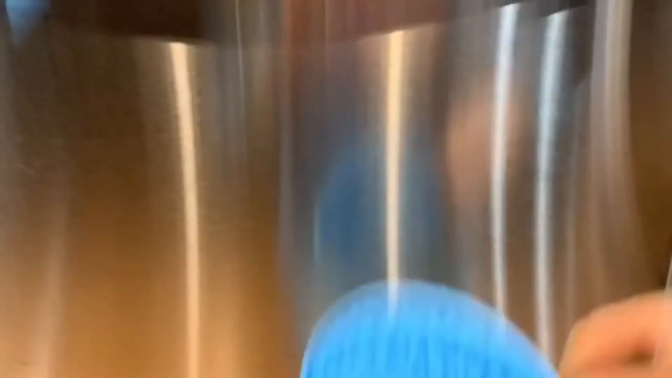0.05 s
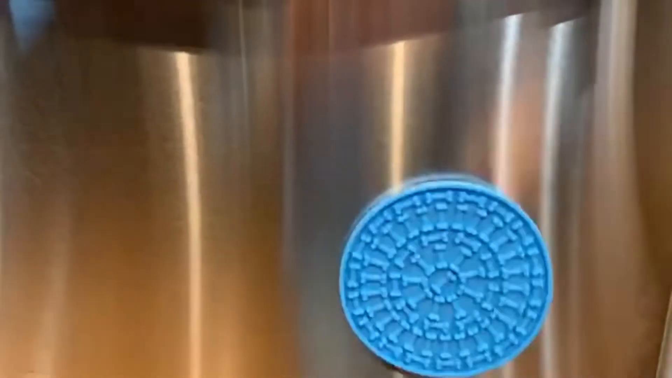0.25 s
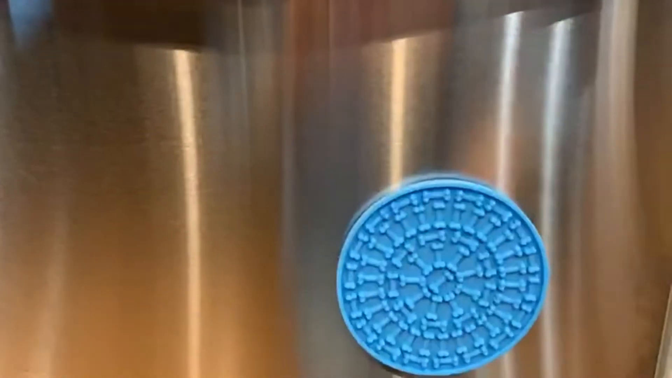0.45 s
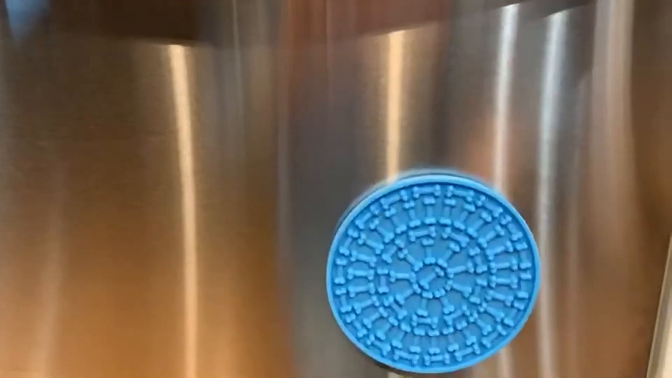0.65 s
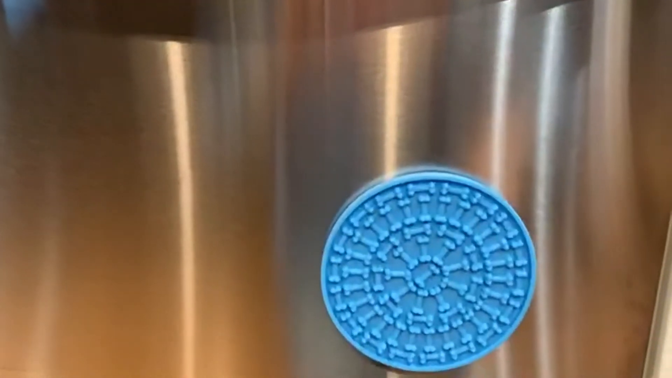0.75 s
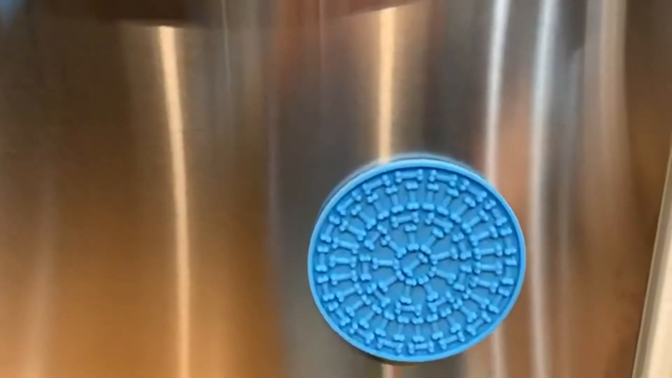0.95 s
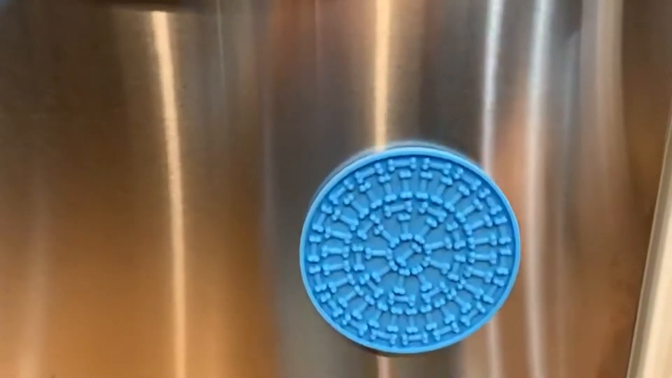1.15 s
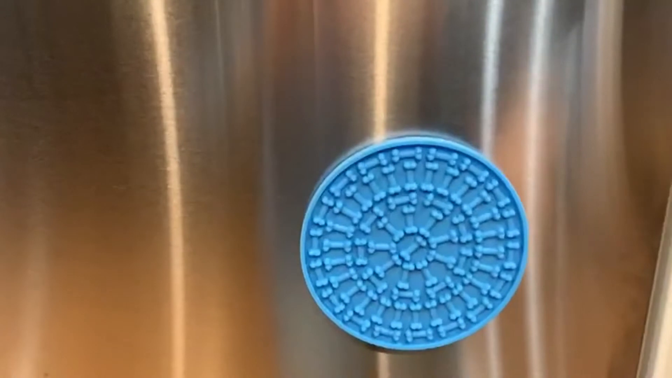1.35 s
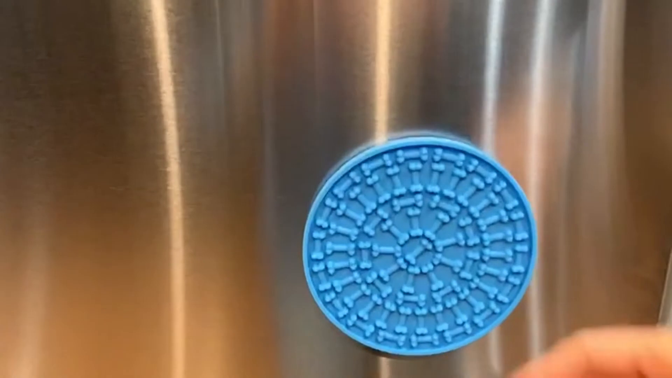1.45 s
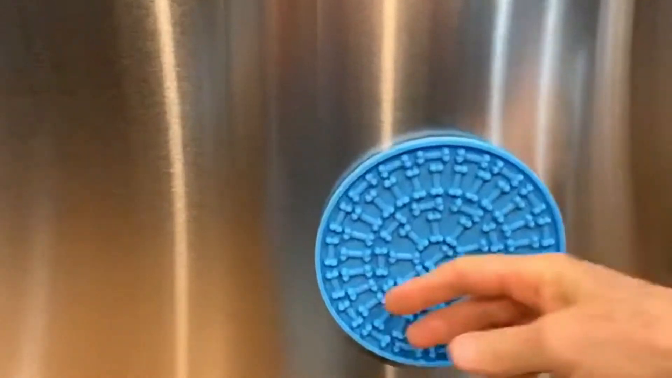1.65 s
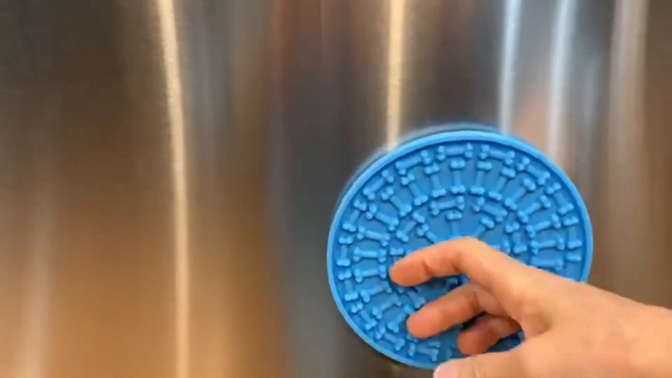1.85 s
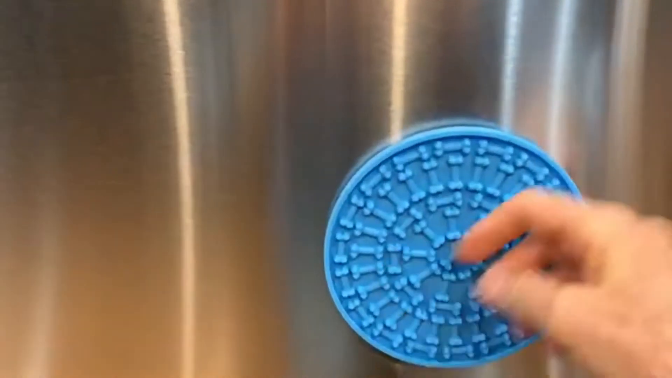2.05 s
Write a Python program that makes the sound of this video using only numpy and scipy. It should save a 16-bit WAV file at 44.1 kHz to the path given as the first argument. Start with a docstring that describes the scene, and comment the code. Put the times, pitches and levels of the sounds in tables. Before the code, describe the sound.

A silicone suction mat smacks onto a steel door, then clicks and squeaks under fingers.

```python
"""A silicone suction mat slapped onto a steel appliance door, close to a stereo microphone in a kitchen.
The door booms, and trapped air pops and fizzes out from under the cups. The door drones faintly; then
fingers land on the mat and press it, so that its cups click and squeak. The higher notes sit a little
to the left, and the room rings briefly over a quiet room tone."""
import sys
import numpy as np
from scipy import signal
from scipy.fft import rfft, irfft
from scipy.io import wavfile

SR = 44100
rng = np.random.default_rng(int(sys.argv[2]) if len(sys.argv) > 2 else 0)


def waveform_to_disk(signal):
    """Save audio, clipped to [-1, 1], as 16-bit WAV at the path in sys.argv[1]."""
    frames = np.transpose(np.atleast_2d(signal))
    scaled = np.clip(frames, -1, 1) * 32767
    samples = np.round(scaled).astype(np.int16)
    wavfile.write(sys.argv[1], SR, samples)


N = 92610
T = np.arange(N) / SR
AGE = np.arange(16384) / SR  # seconds since an event began
WIDE_HZ = 600  # below this, noise narrows towards the centre


def smacks():
    """The mat hits the steel; the panel answers with smacks and thuds that fall quickly in pitch."""
    # Each row: start in seconds, level in dB, first and last pitch in Hz, t60 in seconds.
    landings = [(.209, -2, 1680, 730.6, 0.02), (0.2129, -6.5, 474, 415, 0.049),
                (0.2164, -0.5, 1450, 905, 0.0062), (0.2177, -13, 200, 85, 0.063),
                (.282, -14, 330, 213.8, .27)]
    out, fall_s = np.zeros((2, N)), .0011
    for start, db, from_hz, to_hz, t60 in landings:
        pitch = to_hz + (from_hz - to_hz) * np.exp(-AGE / fall_s)
        add(out, start, undb(db) * leftward(to_hz) * sine(pitch) * envelope(.0004, t60, hold=.00043))
    return out


def door():
    """Each push rings the panel modes near its own pitch; mat and hand damp them."""
    # Each row: start in seconds, level in dB, centre of the excited modes in Hz, share of the free t60.
    pushes = [(0.2122, -10, 244, 0.41), (0.2789, -23.5, 300, 0.72), (0.308, -18, 140, 0.65),
              (0.367, -20.5, 290, 0.61), (0.477, -31, 252, 0.3), (0.769, -48.5, 130, 0.6),
              (1.583, -42, 200, .4), (1.794, -30, 250, 0.9), (1.8054, -12, 181.4, 0.33),
              (1.816, -13.5, 300, 0.39), (1.876, -30.5, 164, 0.63), (1.999, -35, 298, 0.49),
              (2.086, -30.5, 160, 1)]
    # Each row: panel mode in Hz, relative level in dB, free t60 in seconds.
    modes = [(75, -14, 0.34), (112, -7.5, 0.64), (170.4, 1, 0.3), (211.7, 0.5, 0.23), (242.6, -0.5, 0.26),
             (300, 0.5, .28), (348, -7.5, 0.42), (437, -6, 0.28), (561, -5.5, 0.44), (658, 1, 0.23)]
    out, spread_octaves = np.zeros((2, N)), .48
    for start, db, centre_hz, share in pushes:
        for hz, mode_db, t60 in modes:
            coupling = np.exp(-.5 * (np.log2(hz / centre_hz) / spread_octaves) ** 2)
            add(out, start, undb(db + mode_db) * coupling * ring(hz, .0041, t60 * share))
    return out


def pops():
    """Air pockets pop and squeak as they open or close, gliding and wobbling in pitch."""
    # Each row: start in seconds, level in dB, pitch in Hz, glide in octaves, attack and t60 in seconds.
    pockets = [(.129, -49.5, 1248, 0, .003, 0.058), (.2495, -6, 4280, -0.052, 0.0036, 0.011),
               (0.2772, 2.5, 1250, 0.051, 0.00043, 0.016), (0.291, -5.5, 1584, 0.17, 0.00076, 0.011),
               (0.2985, -20.5, 1800, -0.1, 0.0016, .015), (.311, -23.5, 697, 0, 0.0043, 0.081),
               (0.359, -20.5, 2517, 0.025, 0.00035, 0.033), (0.7862, -42, 1277, -8.94, 0.0014, 0.012),
               (1.823, -17.5, 1868, -.1, 0.0024, 0.035), (1.825, -16, 3510, 0.62, 0.001, 0.018),
               (1.829, -6.5, 2466, 0.027, 0.0014, 0.019), (1.836, -4.5, 1568, 0.068, 0.0036, 0.029),
               (1.837, -6.5, 3178, 0.16, 0.0077, 0.022), (1.849, -22.5, 1590, 0, .001, 0.016)]
    out, glide_s, wobble_octaves = np.zeros((2, N)), .0049, .018
    for start, db, hz, glide, attack, t60 in pockets:
        bend = glide * np.minimum(AGE / glide_s, 1) + wobble_octaves * jitter(step_s=.001)
        add(out, start, undb(db) * leftward(hz) * sine(hz * 2 ** bend) * envelope(attack, t60))
    return out


def taps():
    """Fingertips snap the small cups onto the door."""
    # Each row: start in seconds, level in dB, extra gain of the upper modes in dB.
    clicks = [(1.786, -19, -4), (1.799, -6.5, 0), (1.8039, 2.5, -9.5), (1.8196, -6, 0),
              (1.9981, -28.5, -37), (2.077, -27.5, -2.5)]
    # Each row: cup mode in Hz, relative level in dB, t60 in seconds.
    modes = [(1356, -14, 0.027), (1663, -5.5, 0.024), (1740, -14.5, 0.026), (2605, -7, 0.036),
             (3365, -18, 0.034), (4880, -19, .012)]
    out = np.zeros((2, N))
    for start, db, upper_db in clicks:
        for hz, mode_db, t60 in modes:
            gain = undb(db + mode_db + upper_db * (hz > 2000))
            add(out, start, gain * leftward(hz) * ring(hz, .0017, t60))
    return out


def fizzes():
    """Rubber meets steel and air fizzes out."""
    # Each row: start in seconds, level in dB, attack, hold and t60 in seconds, tilt in dB per octave.
    escapes = [(0.131, -51, .002, 0.0055, .07, 0.5), (0.186, -46, 0.0017, 0.0077, 0.033, -1.5),
               (.1975, -32.5, 0.0027, 0.0083, 0.026, -2.5), (.209, -17, 0.00046, 0.0072, 0.055, -1.5),
               (.246, -22.5, 0.0011, .002, .02, 3), (.2486, -18.5, 0.00076, 0.0027, 0.021, -3),
               (.2765, -16, 0.00032, 0.003, 0.0095, 1.5), (0.281, -27.5, 0.0023, 0.067, 0.21, -1.5),
               (.759, -60, .001, 0.0021, 0.12, 1), (.784, -49.5, .002, 0.0033, 0.084, -4.5),
               (0.892, -67.5, .01, 0.017, 0.12, 1), (1.13, -67.5, 0.022, 0.021, .1, 13)]
    # Each row: frequency in Hz, relative level in dB.
    spectrum = [(30, -42.5), (150, -15), (400, 1), (750, 5), (1600, -0.5), (2600, 0.5), (3400, -10.5),
                (5500, -14.5), (7800, -10.5), (10000, -17.5), (12000, -17.5), (16000, -38.5)]
    return bursts(escapes, spectrum)


def crackles():
    """Sticky rubber crackles as it settles or is pressed."""
    # Each row: start in seconds, level in dB, attack, hold and t60 in seconds, tilt in dB per octave.
    shifts = [(.3595, -19.5, .0005, .0035, .02, 3), (1.7975, -32, .0005, .002, .02, 3),
              (1.8033, -23, .0005, .002, .025, 2), (1.815, -26, .006, .02, .05, -.5),
              (1.998, -50, .001, .003, .06, 1), (2.071, -55, .001, .002, .04, 2),
              (2.079, -47, .001, .003, .06, 0)]
    # Each row: frequency in Hz, relative level in dB.
    spectrum = [(30, -55), (200, 2), (900, -18.5), (1300, -2), (1700, -5), (2600, -2), (3500, -13),
                (5000, -9.5), (6500, -23.5), (8200, -12.5), (10000, -31), (16000, -37)]
    return bursts(shifts, spectrum)


def drone():
    """A low door mode hums on unevenly, left of centre."""
    # Each row: time in seconds, level in dB.
    levels = [(0, -65), (1.01, -61.5), (1.045, -44.5), (1.19, -48.5), (1.235, -60), (1.275, -44.5),
              (1.36, -56.5), (1.40, -49), (1.49, -50.5), (1.59, -41.5), (1.76, -56), (2.1, -45)]
    hz, width_hz = 114, 18
    waver = noise(1 / (1 + ((freqs(T) - hz) / width_hz) ** 2), t=T)
    return pan(3.5) * curve(levels) * (np.sin(2 * np.pi * hz * T) + .22 * waver)


def rustle():
    """A soft rustle as the hand comes near."""
    # Each row: time in seconds, level in dB.
    levels = [(0, -64), (.18, -61.5), (.6, -77.5), (1.42, -69.5), (1.62, -56), (1.77, -56.5), (2.1, -63.5)]
    # Each row: frequency in Hz, relative level in dB.
    spectrum = [(1000, -8), (2400, -2), (3400, 2), (4600, -7.5), (6500, -9), (9000, -16), (16000, -23)]
    return curve(levels) * noise(colour(spectrum, T), width=.7, t=T)


def kitchen(direct, send):
    """Adds quick reflections from door and worktop, then the room's tail, fed at the gain `send`."""
    # Each row: echo band in Hz, level in dB, t60 in seconds.
    bands = [(60, -12.5, .45), (200, -11.5, 0.51), (446, -8.5, 0.72), (750, -4, 0.75), (1300, -1.5, 0.73),
             (2400, 0, 0.49), (4500, -2.5, 0.4), (7970, -3.5, 0.38), (15000, -13, .3)]
    age, onset_s = np.arange(32768) / SR, .008
    diffuse, tail = rfft(noise(1, t=age)), 0
    log_hz, log_centres = np.log(freqs(age)), np.log(np.array(bands)[:, 0])
    for k, (hz, db, t60) in enumerate(bands):
        band = np.interp(log_hz, log_centres, np.arange(len(bands)) == k)
        fade = envelope(.025, t60, t=np.maximum(age - onset_s, 0))
        tail += undb(db) * leftward(hz) * irfft(diffuse * band) * fade / np.linalg.norm(fade)
    fade = envelope(.006, t60=.087)
    low_cut = freqs(AGE) / np.hypot(freqs(AGE), WIDE_HZ)
    near = undb(-13) * noise(low_cut) * fade / np.linalg.norm(fade)
    mono = direct.mean(0)[None]
    early = signal.fftconvolve(mono, near, axes=1)[:, :N]
    late = signal.fftconvolve(mono * send, tail, axes=1)[:, :N]
    return direct + early + late


def squeak_echo():
    """A diffuse echo of the squeaks, heard as a short wash of noise."""
    # Each row: frequency in Hz, relative level in dB.
    spectrum = [(900, -1.5), (1400, 2), (1750, -10), (2100, 0), (2550, -13), (3000, 6), (3400, 7),
                (5000, -6), (8000, -28), (16000, -46)]
    return undb(-38.5) * noise(colour(spectrum)) * envelope(.012, t60=.27)


def room_tone():
    """The steady, low hush of the kitchen."""
    # Each row: frequency in Hz, relative level in dB.
    spectrum = [(15, -45.5), (25, -20.5), (43, 3.5), (137, -.5), (223, -2.5), (451, -13), (531, -12),
                (1230, -19.5), (1610, -20.5), (3080, -32), (10100, -33.5), (14800, -30), (16000, -44)]
    return undb(-56) * noise(colour(spectrum, T), width=.89, t=T)


def bursts(events, spectrum):
    """Grainy bursts of noise, each with its own spectral tilt."""
    out, shape, octaves = np.zeros((2, N)), colour(spectrum), np.log2(freqs(AGE))
    for start, db, attack, hold, t60, tilt_db in events:
        hiss = noise(shape * undb(tilt_db * octaves), width=.8)
        hiss *= np.exp(.5 * jitter(step_s=.0005))  # grain
        add(out, start, undb(db) * hiss / hiss.std() * envelope(attack, t60, hold=attack + hold))
    return out


def undb(db):
    """Decibels to gain."""
    return 10 ** (np.asarray(db) / 20)


def curve(points):
    """Gain over time from (s, dB) points."""
    return undb(np.interp(T, *np.array(points).T))


def envelope(attack, t60, hold=0, t=AGE):
    """Linear attack; from time `hold` on, a fall of 60 dB per t60."""
    decay = np.log(1000) * np.maximum(t - hold, 0) / t60
    return np.minimum(t / attack, 1) * np.exp(-np.minimum(decay, 20))


def freqs(t):
    """Frequencies of the spectrum of a sound as long as t."""
    return np.maximum(np.arange(len(t) // 2 + 1) * SR / len(t), 1)


def colour(points, t=AGE):
    """Gain over frequency from (Hz, dB) points."""
    hz, db = np.array(points).T
    return undb(np.interp(np.log(freqs(t)), np.log(hz), db))


def noise(shape, width=1, t=AGE):
    """Stereo noise of rms 1 with the given spectrum; the bass is alike in both channels."""
    hz = freqs(t)
    mid, side = rng.standard_normal((2, len(hz), 2)).view(complex)[..., 0]
    side = side * width * hz / np.hypot(hz, WIDE_HZ)
    x = irfft(np.array([mid + side, mid - side]) * shape, len(t))
    return x / x.std()


def jitter(step_s):
    """A random wander with a new value at every step."""
    return np.interp(AGE / step_s, np.arange(1024), rng.standard_normal(1024))


def pan(left_db):
    """Channel gains with the left louder by left_db."""
    return undb(np.array([[1], [-1]]) * left_db / 2)


def leftward(hz):
    """Channel gains: the higher notes lean to the left."""
    return pan(4 * hz / np.hypot(hz, 600))


def ring(hz, attack, t60):
    """One damped mode."""
    return np.sin(2 * np.pi * hz * AGE) * envelope(attack, t60)


def sine(pitch):
    """A sine that follows a pitch curve."""
    return np.sin(2 * np.pi * np.cumsum(pitch) / SR)


def add(out, start, sound):
    """Mixes a sound in at its start time."""
    first = int(start * SR)
    out[:, first:first + sound.shape[-1]] += sound[..., :N - first]


def scene():
    """The slap drives the whole door and fills the room; the finger sounds stay closer and drier."""
    slap_room_db, finger_room_db = -6, -19.5
    direct = smacks() + door() + pops() + taps() + fizzes() + crackles()
    out = kitchen(direct, send=curve([(1, slap_room_db), (1.5, finger_room_db)]))
    add(out, 1.83, squeak_echo())
    return out + room_tone() + rustle() + drone()


def record(dry):
    """Rounds the loudest peaks, thins the deepest bass and cuts the top."""
    ceiling, low_cut_hz, top_hz = 1.15, 47, 16400
    rounded = ceiling * np.tanh(dry / ceiling)
    thinned = signal.sosfilt(signal.butter(2, low_cut_hz, "high", fs=SR, output="sos"), rounded)
    return signal.sosfilt(signal.ellip(8, .2, 70, top_hz, fs=SR, output="sos"), thinned)


dry = scene()
out = record(dry)
waveform_to_disk(out)
```